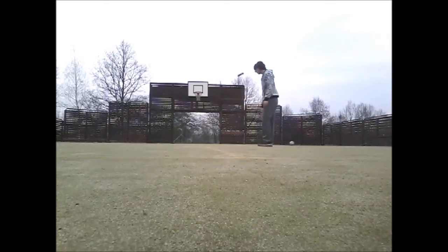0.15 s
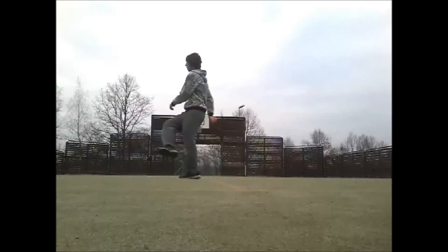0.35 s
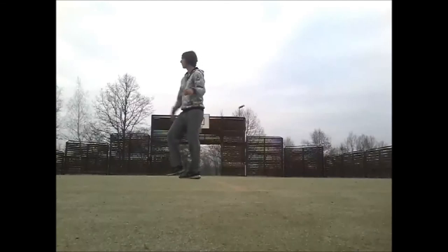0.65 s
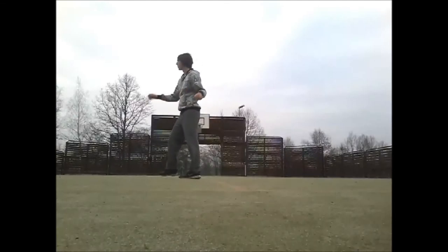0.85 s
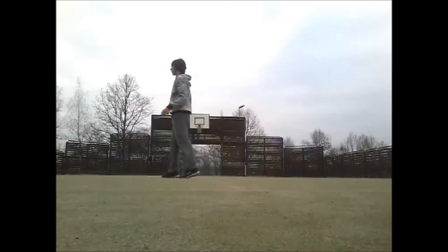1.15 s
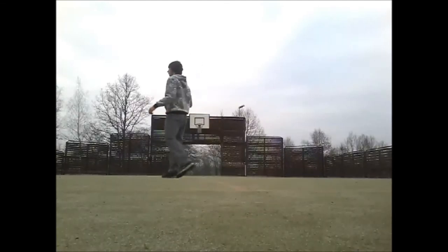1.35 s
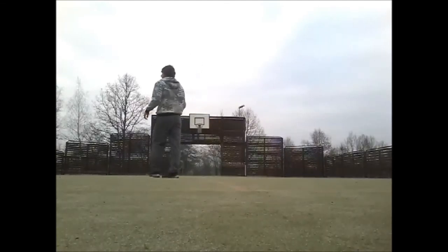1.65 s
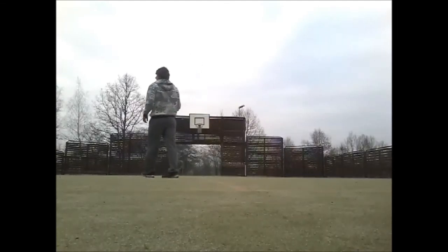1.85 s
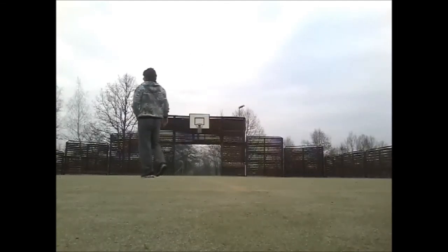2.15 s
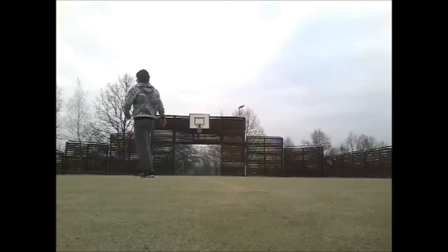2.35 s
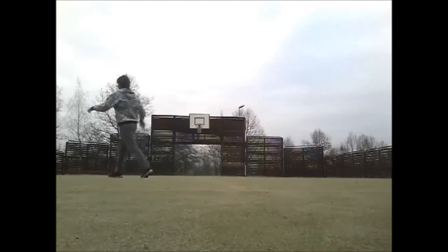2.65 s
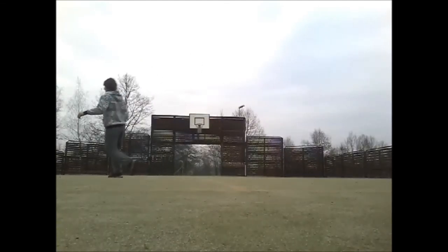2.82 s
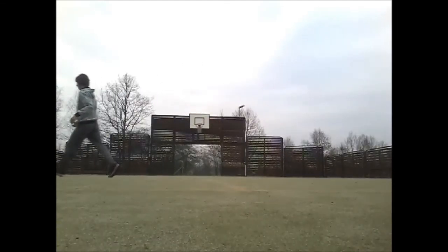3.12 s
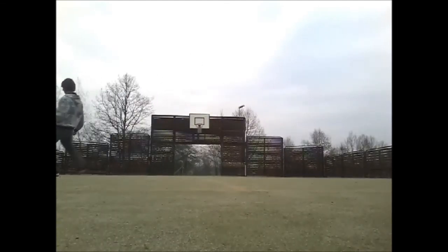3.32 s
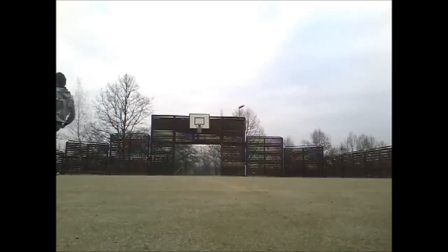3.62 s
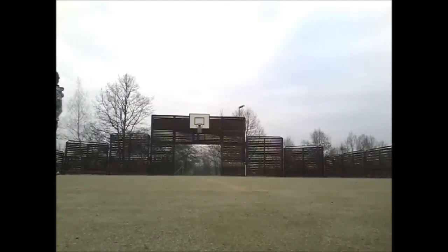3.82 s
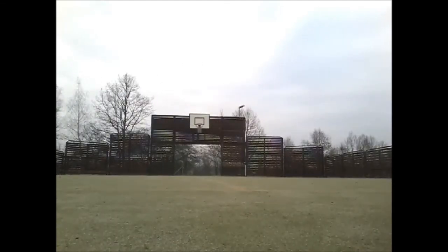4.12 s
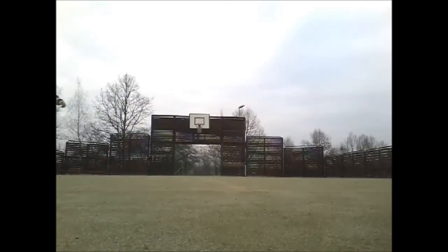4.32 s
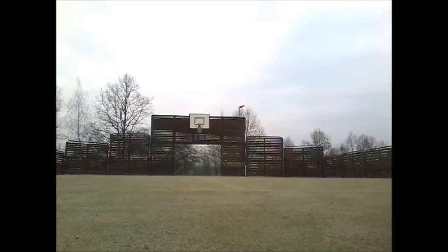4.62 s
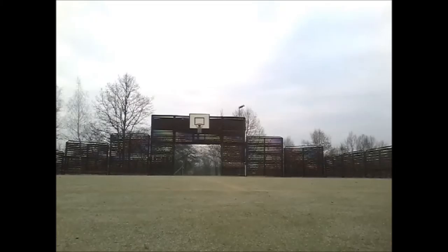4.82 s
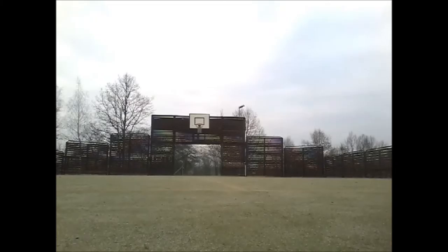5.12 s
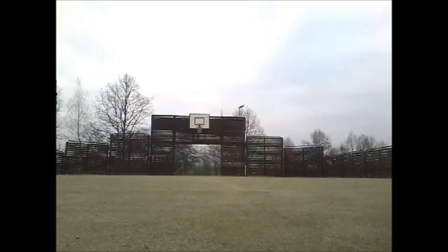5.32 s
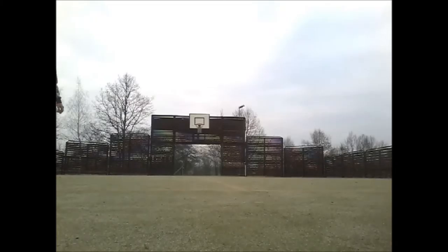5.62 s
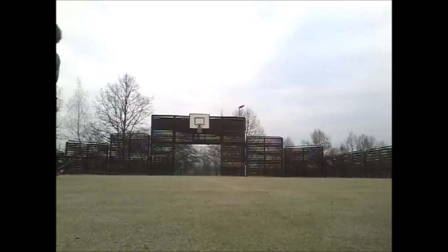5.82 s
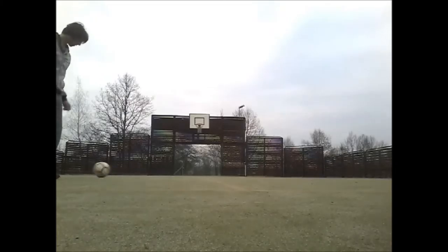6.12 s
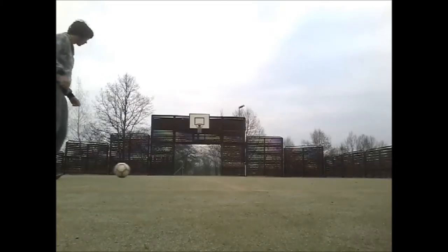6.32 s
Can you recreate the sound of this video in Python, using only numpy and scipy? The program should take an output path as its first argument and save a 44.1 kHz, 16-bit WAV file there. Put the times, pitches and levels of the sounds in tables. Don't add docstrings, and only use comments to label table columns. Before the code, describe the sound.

A football slams into a wooden fence on an open court with booming reverberation and rattling knocks, then two more kicks and crackly rolling on artificial grass.

```python
import sys
import numpy as np
from scipy import signal
from scipy.fft import rfft, irfft
from scipy.io import wavfile
from scipy.ndimage import uniform_filter1d

SR = 44100
rng = np.random.default_rng(int(sys.argv[2]) if len(sys.argv) > 2 else 0)


def natural_amplitude(level_db):
    exponent = np.asarray(level_db, float) / 20
    return 10 ** exponent


def materialize(psi):
    bounded = np.clip(np.atleast_2d(psi).T, -1, 1)
    quanta = np.round(bounded * 32767).astype(np.int16)
    wavfile.write(sys.argv[1], SR, quanta)


N = 284886


def evened(x):
    return x / np.sqrt(np.mean(x ** 2) + 1e-30)


def read(points, hz):
    f, value = np.transpose(points)
    return np.interp(np.log(hz + 1), np.log(f + 1), value)


def add(mix, s, sound):
    part = mix[round(s * SR):][:len(sound)]
    part += sound[:len(part)]


def colour(x, points, tilt_db=0):
    hz = abs(np.fft.fftfreq(2048, 1 / SR))
    octaves = np.log2(np.clip(hz, 700, 8000) / 2000)
    log_gain = np.log(natural_amplitude(np.maximum(read(points, hz), -100) + tilt_db * octaves))
    taps = np.fft.ifft(np.exp(np.conj(signal.hilbert(log_gain)))).real[:1024]
    return signal.oaconvolve(x, taps)


def modes(table, count):
    t = np.arange(count) / SR
    return sum(natural_amplitude(db - 60 * t / t60) * np.sin(2 * np.pi * hz * t) for hz, db, t60 in table)


def drift(count, smooth_s):
    size = max(int(smooth_s * SR), 1)
    smooth = uniform_filter1d(rng.standard_normal(count), size)
    return evened(uniform_filter1d(smooth, size))


# frequency in Hz, level in dB per Hz.
WASH_SPECTRUM = [(15, -46.5), (25, -13.5), (45, -1), (62, 7.5), (81, -6), (394, -11), (515, -10),
                 (558, -18.5), (604, -11), (1150, -18.5), (3090, -17.5), (4150, -20), (13500, -30),
                 (15000, -27.5)]
# time in seconds, level in dB.
SWELL = [(0, 7.5), (.3, 0.5), (1.5, 13), (2.3, 0), (3.2, 3.5), (4.601, 8.5), (5.0, 3), (5.7, 8), (6.46, 2)]


def wash():
    hz, t, z = signal.stft(rng.standard_normal(N + 2048), SR, nperseg=1024)
    s, db = np.transpose(SWELL)
    share = np.clip(np.log(5000 / (hz + 1)) / np.log(3.5), .3, 1)[:, None]
    patches = uniform_filter1d(rng.standard_normal(z.shape), 10, 0)
    patches = evened(uniform_filter1d(patches, 8, 1))
    z = z * natural_amplitude(read(WASH_SPECTRUM, hz)[:, None])
    z = z / np.sqrt(np.sum(abs(z) ** 2) / len(t))
    z = z * natural_amplitude(share * np.interp(t, s, db) + 0.4 * patches)
    return natural_amplitude(-71.5 - 27) * signal.istft(z * 20, SR, nperseg=1024)[1][:N]


# frequency in Hz, level in dB per Hz.
RINGS = [
    [(30, -14.5), (80, -1), (300, -8.5), (900, 1), (2000, -6.5), (3200, -22.5), (7000, -19), (14000, -26)],
    [(30, -37), (130, -10.5), (300, -4), (1200, -0.5), (2000, -8.5), (3600, -20.5), (6500, -34),
     (14000, -56)],
    [(30, -40.5), (130, 0), (260, -14.5), (550, 3.5), (1050, 1.5), (1500, -11.5), (2200, -13),
     (3200, -18.5), (4300, -28.5), (6500, -34), (8000, -47), (14000, -52.5)],
    [(30, -33), (110, -6), (250, 2.5), (480, -10.5), (750, 6), (1300, 2.5), (2500, 1.5), (4000, -30),
     (6500, -42), (14000, -56)],
    [(30, -45), (140, -8), (250, -8), (550, -4), (1100, -0.5), (2000, -2.5), (3100, -14.5), (4300, -24),
     (6300, -26), (8000, -32.5), (14000, -36)],
]
# time in seconds, level in dB.
FADING = [
    (0, -68.5),
    (.16, -70.5),
    (.22, -84),
]


def earlier_blow():
    t = np.arange(SR // 4) / SR
    fading = evened(colour(rng.standard_normal(len(t)), RINGS[3])[:len(t)])
    return natural_amplitude(np.interp(t, *np.transpose(FADING))) * fading


def brush(db, length_s, tilt_db):
    u = np.arange(3000) / SR / max(length_s, .001)
    crackle = rng.standard_normal(len(u)) * natural_amplitude(3.4 * drift(len(u), 0.00035))
    shape = np.minimum(u / 0.13, 1) * (np.exp(-(u / 0.91) ** 3) + 0.23 * np.exp(-u))
    return natural_amplitude(db - 8.5) * evened(colour(crackle, GRASS, tilt_db)[:len(u)]) * shape


# frequency in Hz, level in dB per Hz.
RASP = [(200, -22), (600, -14.5), (1100, -4.5), (2200, -5), (3400, -6), (4300, -13.5), (5200, -10),
        (6500, -13.5), (7200, -26), (9000, -35), (14000, -54)]
ROLL = [(120, -2), (200, -3), (540, -6), (609, -22), (652, -13), (2020, 0.5), (3300, -10.5), (4440, -25),
        (6050, -15), (12000, -40), (15600, -62), (22000, -120)]
# time in seconds, level in dB, share of rolling from 0 to 1.
DRAG = [
    (5.415, -50.5, 0),
    (5.452, -34, 0.17),
    (5.475, -34.5, 0),
    (5.499, -52, 0.4),
    (5.595, -51, 0.82),
    (5.635, -53, 0.75),
    (5.68, -48.5, 0.04),
    (5.71, -55, 0.8),
    (5.78, -69, .5),
]


def drag():
    s, db, rolling = np.transpose(DRAG)
    t = np.arange(s[0], s[-1], 1 / SR)
    share = np.clip(np.interp(t, s, rolling), 0, 1)
    grain_db = 2.2 * drift(len(t), .001) + 1.5 * drift(len(t), .008)
    crackle = rng.standard_normal(len(t)) * natural_amplitude(grain_db)
    rasp, roll = (evened(colour(crackle, points)[:len(t)]) for points in (RASP, ROLL))
    sound = (1 - share) * rasp + share * roll
    return s[0], natural_amplitude(np.interp(t, s, db)) * sound * signal.windows.tukey(len(t), .05)


# frequency in Hz, level in dB per Hz.
GRASS = [(150, -12.5), (500, -14), (1100, -10.5), (1800, -8.5), (2700, -2.5), (3800, -1.5), (4500, -7.5),
         (5300, -3), (6500, -8), (7200, -20.5), (8000, -22), (14000, -34.5)]
# start in seconds, peak in dB, length in seconds, tilt in dB per octave.
STEPS = [(0.4873, -36.5, 0.032, -3.5), (0.7482, -40, 0.029, 0), (3.2842, -45, 0.043, -5),
         (3.3094, -50, 0.044, -0.5), (3.366, -54, 0.044, -6.5), (3.949, -34.5, 0.028, -2),
         (4.1905, -27.5, 0.022, -1.5), (4.408, -34.5, 0.022, -1), (4.4085, -30.5, 0.011, 0.5),
         (4.5627, -47, 0.029, -1), (4.5935, -39.5, 0.031, -2), (4.6876, -45.5, 0.025, -0.5),
         (5.1535, -54, 0.057, -2), (5.8135, -39, 0.022, -0.5), (6.0088, -36, 0.025, -3.5),
         (6.028, -45.5, 0.022, -2)]
# start in seconds, peak in dB.
SCUFFS = [
    (0.33, -46),
    (0.393, -70),
    (1.162, -54),
    (1.1831, -33),
    (4.632, -48),
    (5.676, -39.5),
    (6.044, -44.5),
]
# start in seconds, peak in dB, contact in seconds.
HOPS = [
    (1.114, -22.5, 0.014),
    (1.3343, -26.5, 0.016),
    (1.486, -42.5, 0.025),
    (1.62, -44, 0.013),
    (1.7065, -54, 0.034),
    (1.762, -54.5, 0.02),
    (1.826, -63, .017),
    (1.874, -59, 0.01),
]
# start in seconds, peak in dB.
FAR_SEAMS = [(2.04, -61), (2.064, -62.5), (2.1155, -58.5), (2.171, -57), (2.2621, -62), (2.6379, -61.5),
             (2.738, -64), (2.8394, -63.5), (2.8994, -65), (2.995, -62), (3.039, -69), (3.096, -64)]
# start in seconds, peak in dB, length in seconds.
NEAR_SEAMS = [(4.82, -50.5, 0.028), (4.882, -58, 0.051), (4.929, -60.5, 0.067), (4.971, -55, 0.016),
              (5.018, -55.5, 0.028), (5.076, -56.5, 0.022), (5.118, -52, 0.013), (5.134, -51.5, .025),
              (5.234, -52, 0.023), (5.255, -50.5, .02), (5.318, -51.5, .024), (5.394, -51.5, 0.029),
              (5.9274, -54.5, 0.025), (6.109, -48.5, 0.021), (6.187, -48, 0.022), (6.244, -54.5, 0.027),
              (6.307, -55.5, 0.031), (6.354, -56.5, 0.065), (6.414, -60, 0.054)]
# start in seconds, peak in dB, tilt in dB per octave.
TICKS = [(0.307, -43, -8.5), (0.3339, -42, -12), (3.2205, -47.5, -3.5), (4.666, -50, -6),
         (5.6509, -33, 5.5), (5.699, -51, 7), (5.7445, -46, -10), (5.8064, -39, 6.5), (0.488, -45, -12.5),
         (6.4505, -44, -8), (3.547, -30.5, -5)]


def turf():
    grass = np.zeros(N)
    rows = list(STEPS)
    rows += [(s, db, 0.028, -9) for s, db in SCUFFS]
    rows += [(s, db, length_s, -5) for s, db, length_s in HOPS]
    rows += [(s, db, 0.026, -0.5) for s, db in FAR_SEAMS]
    rows += [(s, db, length_s, -0.7) for s, db, length_s in NEAR_SEAMS]
    rows += [(s, db, 0.0055, tilt_db) for s, db, tilt_db in TICKS]
    for s, *row in rows:
        add(grass, s - .002, brush(*row))
    add(grass, *drag())
    scatter = irfft(np.exp(1j * np.angle(rfft(rng.standard_normal(700)))))
    add(grass, .034, natural_amplitude(-14.5) * signal.oaconvolve(grass, scatter)[:N])
    return grass


def shudder(db, hz, length_s):
    u = np.arange(2400) / SR / max(length_s, .001)
    wobble = 190 * np.cumsum(drift(len(u), .0007)) / SR
    turns = hz * u * length_s + wobble + rng.random()
    return natural_amplitude(db) * np.sin(2 * np.pi * turns) * 4 * u * np.exp(-2 * u ** 0.56)


def jolt(db, hz):
    t = np.arange(1500) / SR
    turns = np.cumsum(hz * (1 + 0.12 * drift(len(t), .0004))) / SR + rng.random()
    t60 = 0.024 * (hz / 1000) ** -0.13
    return natural_amplitude(db + 6 - 60 * t / t60) * np.sin(2 * np.pi * turns) * (1 - np.exp(-t / 0.0013))


# frequency in Hz, level in dB, t60 in seconds.
KNOCK_MODES = [(400, 0.5, 0.0081), (899, -20.5, 0.15), (1250, -25, 0.048), (1387, 10, 0.0085), (1776, 4, 0.01),
               (1986, 2.5, 0.01), (2057, -26, 0.037), (2500, -4.5, 0.0053), (3060, -14, 0.011)]


def knock(db):
    table = np.array(KNOCK_MODES) * (1 + [.015, 0, .15] * rng.standard_normal((len(KNOCK_MODES), 3)))
    table[:, 1] += 1.2 * rng.standard_normal(len(KNOCK_MODES))
    t = np.arange(3000) / SR
    sound = modes(table, count=3000) * (1 - np.exp(-t / 0.00059)) ** 2
    sound = sound / abs(sound).max()
    slats = rng.standard_normal(len(t)) * natural_amplitude(-27 - 60 * t / 0.1) * (t > .002)
    scattered = signal.oaconvolve(uniform_filter1d(sound, size=19), slats)[:len(t)]
    out = np.pad(sound + scattered, (0, 1200))
    add(out, .0235, natural_amplitude(-12.5) * uniform_filter1d(sound, size=14))
    return natural_amplitude(db) * out


# start in seconds, peak in dB, pitch in Hz, length in seconds.
CREAKS = [
    (0.082, -59, 864, 0.017),
    (0.117, -62, 870, 0.016),
    (0.147, -62.5, 876, 0.02),
    (0.279, -60, 2450, 0.029),
    (0.432, -61, 895, 0.0054),
    (0.532, -53, 1960, .0066),
]
# start in seconds, level in dB, pitch in Hz.
JOLTS_SLAM = [(0.8605, -25, 2930), (0.8615, -39, 3740), (0.863, -19, 1330), (0.868, -38, 3060),
              (0.872, -20, 1320), (0.879, -19, 1250), (0.8849, -21, 1290), (0.8934, -23, 3170),
              (0.8939, -18, 1760), (0.8939, -14, 994), (0.8999, -12, 1285), (0.9009, -29, 3360),
              (0.9074, -37, 3320), (0.9149, -39, 3200), (0.9164, -17, 966), (0.9259, -11, 1110),
              (0.9348, -32, 3150), (0.9388, -33, 1940), (0.9473, -34, 2330), (0.9483, -38, 3420),
              (0.9493, -49, 4390), (0.9513, -19, 1080), (0.9543, -47, 3460), (0.9593, -22, 770),
              (0.9693, -28, 3000), (0.9693, -31, 630), (0.9732, -27, 1950), (0.9772, -32, 3120),
              (0.9807, -25, 1250), (0.9852, -44, 2650), (0.9857, -18, 780), (1.0146, -42, 3550),
              (1.0181, -41, 2300), (1.0191, -50, 3100), (1.0191, -20.5, 980), (1.0281, -25.5, 1310),
              (1.0296, -51, 3450), (1.0366, -54, 3140), (1.0446, -18.5, 1180), (1.0561, -23, 1040),
              (1.065, -24, 1290), (1.0765, -51, 3400), (1.0835, -24.5, 1083), (1.0975, -31, 990),
              (1.1034, -55, 3400), (1.1049, -36, 900), (1.1084, -54, 4400), (1.1084, -56, 3500)]
JOLTS_SOFT = [(3.57, -50.5, 2710), (3.581, -46, 4120), (3.5805, -27.5, 2070), (3.5807, -44, 1340),
              (3.59, -45, 2500), (3.6079, -55, 3820), (3.6079, -48, 1060), (3.6084, -39, 2600),
              (3.6159, -51, 2660), (3.6239, -42, 1410), (3.6264, -55, 3660), (3.6279, -44, 2500),
              (3.6343, -37, 866), (3.639, -42, 1870), (3.6404, -45, 2670), (3.6518, -31.5, 1720),
              (3.665, -43, 1980), (3.6673, -43, 1000), (3.6723, -39, 1850), (3.6857, -48, 1380),
              (3.6962, -42, 1160), (3.6997, -43, 1910), (3.7017, -42, 780), (3.7127, -47, 1520),
              (3.717, -44, 1960), (3.7236, -43, 1900), (3.7246, -42, 1120), (3.7334, -38, 1480),
              (3.7436, -45, 1490), (3.7487, -48, 1030), (3.7576, -56, 1290), (3.7581, -61, 2350),
              (3.767, -50, 1080), (3.778, -59, 1460), (3.788, -46, 1500), (3.795, -64, 1710)]
JOLTS_HARD = [(4.041, -25, 2130), (4.0475, -17.5, 1295), (4.0512, -24.5, 2980), (4.058, -31, 1350),
              (4.0639, -35, 1130), (4.0704, -33, 2100), (4.0714, -37, 1210), (4.0774, -31, 3160),
              (4.0784, -36, 3880), (4.078, -33, 2100), (4.0792, -23, 1020), (4.0889, -28, 2120),
              (4.0883, -28, 1310), (4.092, -30, 3060), (4.0944, -25, 703), (4.1093, -36, 2140),
              (4.1178, -28, 1940), (4.1223, -39, 1400), (4.1317, -18, 1040), (4.1438, -40, 2220),
              (4.1475, -32, 1250), (4.1676, -32, 1330), (4.1787, -41, 1250), (4.1877, -30.5, 950),
              (4.187, -38, 2930), (4.1954, -42, 2770), (4.1961, -41, 4130), (4.198, -34, 1250),
              (4.2016, -48, 3760), (4.2104, -22, 1280), (4.2224, -36, 1330), (4.2216, -37, 2360),
              (4.2256, -49, 2240), (4.2261, -41, 1180), (4.239, -32, 1940), (4.239, -37, 1360),
              (4.2475, -32, 1130), (4.251, -33, 1350), (4.26, -44, 1250), (4.2675, -40, 1190),
              (4.273, -37, 1300), (4.2857, -42, 1130), (4.2947, -39, 1100), (4.3054, -47, 2040),
              (4.3198, -38, 1130), (4.32, -48, 2000), (4.3269, -38, 1250), (4.3388, -50, 1160),
              (4.3398, -53, 1890), (4.3453, -51, 1210), (4.349, -49, 1150), (4.3645, -49, 1190),
              (4.3737, -58, 1370), (4.3825, -49, 1160), (4.3913, -46, 1250), (4.3947, -51, 3450)]
JOLTS_LATE = [(1.127, -30, 915), (1.135, -25, 980), (1.172, -37, 1210), (1.202, -40, 1280),
              (1.2741, -40, 730), (1.3132, -30, 816), (5.445, -35, 2010), (5.4574, -40, 1370),
              (5.4587, -33, 2760), (5.466, -38, 2750), (5.59, -45, 2090), (5.5966, -50, 2000),
              (5.65, -46, 1870), (5.6694, -60, 2460), (5.679, -50, 1110), (5.6984, -52, 1890),
              (5.743, -58, 2630)]
# first knock in seconds, period in seconds.
KNOCK_TIMES = [
    (1.1122, .1394),
    (1.1847, .138),
]
KNOCKS_DB = [
    [-22, -19, -21.5, -25, -34],
    [-19, -22.5, -31.5, -32.5],
]


def fence():
    mix = np.zeros(N)
    for s, *row in CREAKS:
        add(mix, s, shudder(*row))
    for s, *row in JOLTS_SLAM + JOLTS_SOFT + JOLTS_HARD + JOLTS_LATE:
        add(mix, s + .0001, jolt(*row))
    for (first_s, period_s), levels_db in zip(KNOCK_TIMES, KNOCKS_DB):
        for k, db in enumerate(levels_db):
            add(mix, first_s + k * period_s, knock(db))
    return mix


# frequency in Hz, t60 in seconds.
COURT = [(60, 0.98), (200, 0.86), (500, 0.76), (1000, 0.73), (1800, 0.56), (3000, 0.5), (6000, 0.61)]
# frequency in Hz, level in dB, t60 in seconds.
PANEL = [(151.4, -4, .22), (460, -16.5, 0.36), (496, -13.5, 0.6), (616, -17.5, 0.28), (761, -3, 0.23),
         (99.8, -10.5, 0.62), (1020, -9, .6), (1058, -13.5, 0.47), (1254, -12, 0.48), (3300, -18, 0.17),
         (3450, -13.5, 0.22)]


def ring(db, decay, lumps_db, last_s, points, panel_db, thin_db, thin_s):
    count = SR + SR // 2
    echoes = rng.standard_normal(count) * natural_amplitude(lumps_db * drift(count, .0018))
    hz, t, z = signal.stft(echoes, SR, nperseg=256)
    patches = uniform_filter1d(rng.standard_normal(z.shape), 8, 0)
    patches = evened(uniform_filter1d(patches, 3, 1))
    echoes = signal.istft(z * natural_amplitude(2.0 * patches), SR, nperseg=256)[1]
    hz, t, z = signal.stft(echoes, SR, nperseg=1024)
    z = z * natural_amplitude(read(points, hz)[:, None] - 60 * t / (decay * read(COURT, hz)[:, None]))
    tail = signal.istft(z, SR, nperseg=1024)[1][:count]
    tail = tail / np.sqrt(np.mean(tail[:2000] ** 2))
    mids = signal.sosfiltfilt(signal.butter(2, [600, 3800], "band", fs=SR, output="sos"), tail)
    t = np.arange(count) / SR
    tail = tail - mids * (1 - natural_amplitude(thin_db)) * np.clip((thin_s - t) / 0.017, 0, 1)
    rise = (1 - np.exp(-t / 0.0027)) * natural_amplitude(-55 * np.maximum(t - last_s, 0))
    return rise * (natural_amplitude(db) * tail + natural_amplitude(panel_db) * modes(PANEL, count))


def thud(db, hz, t60):
    t = np.arange(6000) / SR
    lowpass = signal.butter(2, min(3 * hz, 1500), fs=SR)
    crunch = signal.lfilter(*lowpass, rng.standard_normal(len(t)))
    push = np.sin(2 * np.pi * hz * t) + 0.31 * evened(crunch)
    return natural_amplitude(db - 60 * t / max(t60, .005)) * push * (1 - np.exp(-t / 0.00022)) * 1.8


# frequency in Hz, level in dB per Hz.
SLAP = [(100, -22.5), (250, -5.5), (1200, 6.5), (2200, -3), (3400, 0), (4500, -10), (6200, -15),
        (7500, -40), (14000, -44)]


def slap(db, smear_s, tilt_db):
    t = np.arange(700) / SR
    drive = .5 * rng.standard_normal(len(t)) * np.exp(-t / max(smear_s, 2e-4))
    drive[0] = 5.5
    sound = colour(drive, SLAP, np.clip(tilt_db, -5, 5))
    return natural_amplitude(db) * sound / abs(sound).max()


# start in seconds, peak in dB, smear in seconds, brightness in dB per octave.
SLAPS = [
    (0.8576, -9.5, 0.0054, -0.5),
    (3.546, -12.5, 0.0021, -1),
    (4.0372, -3, 0.0031, 1),
]
# start in seconds, peak in dB, brightness in dB per octave.
ECHOES = [(0.895, -9.5, -4), (0.9351, -8, -1), (0.97, -17.5, -4), (3.5658, -19, 0), (3.5817, -21.5, -3),
          (3.6085, -28, -1), (3.628, -34, -4), (3.64, -28, -7), (3.655, -31, -3), (3.667, -33, -2.5),
          (4.049, -11, 1), (4.064, -26, -6), (4.072, -21, -5), (4.078, -21, 6.5), (4.091, -21.5, 1),
          (4.111, -32, -8), (4.118, -16.5, -2), (4.124, -35, 3), (4.135, -16, -7), (4.167, -25, -8),
          (4.2391, -38, 0.5), (1.0441, -26.5, -11), (1.013, -29, -1.5)]
# start in seconds, peak in dB, pitch in Hz.
THUDS = [(0.308, -54, 137), (0.49, -51, 504), (0.86, -21.5, 145), (2.018, -55, 352), (3.342, -46.5, 454),
         (3.58, -29.5, 220), (3.603, -39, 117), (3.726, -40, 108), (3.738, -43.5, 258), (4.039, -20, 154),
         (4.072, -29.5, 149), (4.197, -36, 72), (4.599, -63, 405), (5.181, -46.5, 402), (5.291, -58, 70.7),
         (5.650, -35.5, 507), (5.654, -42, 174), (5.678, -42, 560), (5.689, -45.5, 288), (5.72, -47.5, 229),
         (6.012, -53, 490)]
# start in seconds, peak in dB, pitch in Hz.
DEAD_THUDS = [
    (.332, -43.5, 79),
    (0.894, -26.5, 155.2),
    (6.053, -36.5, 534),
    (6.447, -44.5, 329),
]
# start in seconds, peak in dB, pitch in Hz, t60 in seconds.
REBOUND = [
    (0.8954, -7, 880, .006),
    (3.5472, -19.5, 240, .014),
    (3.5481, -26.5, 105, .042),
]
# start in seconds, level in dB, decay factor, lumpiness in dB,
# last far echo in seconds after the blow.
BLOWS = [
    (.335, -57.5, 1.8, 5.5, 0.21),
    (0.859, -25.5, 1.97, 3.5, 0.53),
    (.896, -26, 1.43, 5, 0.9),
    (3.569, -36.5, 1.16, 2.5, 0.15),
    (4.04, -26, 1.3, 3, 0.27),
]
# drive of the panel in dB, level of the thin mids in dB, their duration in seconds.
PANEL_DB = [-72, -42, -23.5, -66, -27]
THIN_DB = [1, 0.5, -4, -6.5, -1.5]
THIN_S = [0.071, 0.31, 0.214, 0.19, 0.37]


def blows():
    mix = np.zeros(N)
    for s, *row in SLAPS:
        add(mix, s + 0.00051, slap(*row))
    for s, db, tilt_db in ECHOES:
        late_s = min(s - first for first, *_ in SLAPS if first < s)
        smear_s = 0.0032 + 0.039 * late_s
        add(mix, s + 0.0011, -slap(db, smear_s, tilt_db))
    for s, db, hz in THUDS:
        add(mix, s, thud(db, hz, 0.043 * (hz / 100) ** -0.73))
    for s, db, hz in DEAD_THUDS:
        add(mix, s, thud(db, hz, .011))
    for s, *row in REBOUND:
        add(mix, s, -thud(*row))
    for (s, *row), *more in zip(BLOWS, RINGS, PANEL_DB, THIN_DB, THIN_S):
        add(mix, s, ring(*row, *more))
    return mix


def scene():
    mix = wash() + blows() + fence() + turf()
    add(mix, 0, earlier_blow())
    return mix[None]


# start in seconds, end in seconds.
SHORT_SPANS = [(.84, .945), (3.53, 3.55), (4.02, 4.04)]


def starved(x):
    lead = 520
    window = signal.windows.kaiser_bessel_derived(2048, 4 * np.pi)
    grid = dict(fs=SR, window=window, nperseg=2048, noverlap=1024)
    hz, t, z = signal.stft(np.pad(x, (lead, 0)), **grid)
    power = abs(z) ** 2
    mids_db = 10 * np.log10(power[(hz > 2000) & (hz < 6500)].mean(0) + 1e-20)
    band_db = 10 * np.log10(uniform_filter1d(power, size=32, axis=0) + 1e-20)
    chance = rng.standard_normal((50, len(t)))[(hz // 450).astype(int)]
    at_s = t - lead / SR
    spared = np.any([(at_s > a) & (at_s < b) for a, b in SHORT_SPANS], axis=0)
    drained_db = 14 * np.roll(spared, 1) + 7 * np.roll(spared, 2) + 4 * np.roll(spared, 3)
    slope_db = 4 * np.log2(hz / 8000 + .01)[:, None]
    lack_db = mids_db + drained_db - band_db - 23 + slope_db + 5 * chance
    keep = (hz[:, None] < 7300) | (lack_db < 0) | spared
    return signal.istft(z * keep * (hz < 14600)[:, None], **grid)[1][lead:N + lead]


def roll_off(x):
    return signal.sosfilt(signal.butter(12, 15320, fs=SR, output="sos"), x)


def record(dry):
    x = signal.sosfilt(signal.butter(6, 54, "high", fs=SR, output="sos"), dry[0])
    body = signal.sosfilt(signal.butter(2, 1500, fs=SR, output="sos"), x)
    level = np.sqrt(abs(uniform_filter1d(body ** 2, size=4000, origin=1500)))
    hiss = np.diff(rng.standard_normal(N + 1)) + 2.4 * rng.standard_normal(N)
    hissing = x + natural_amplitude(-46.0) * np.minimum(level, .01) ** 0.49 * hiss
    return roll_off(starved(hissing)[None])


dry = scene()
out = record(dry)
materialize(out)
```